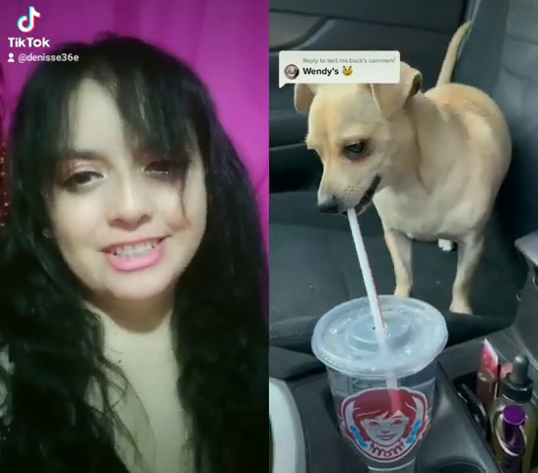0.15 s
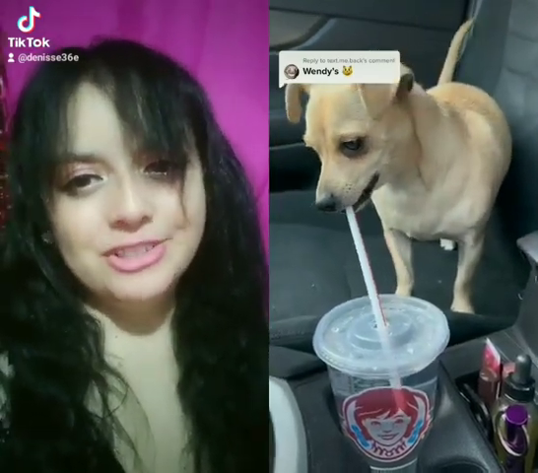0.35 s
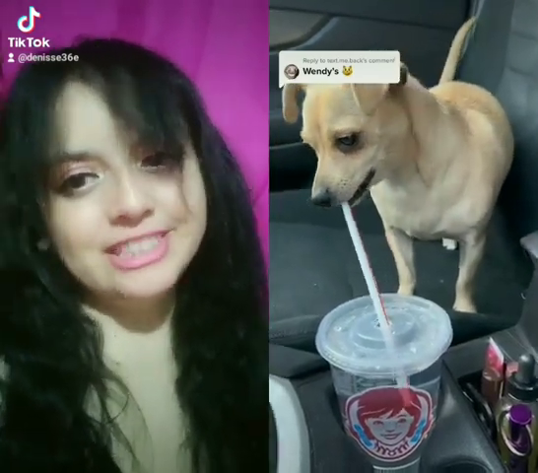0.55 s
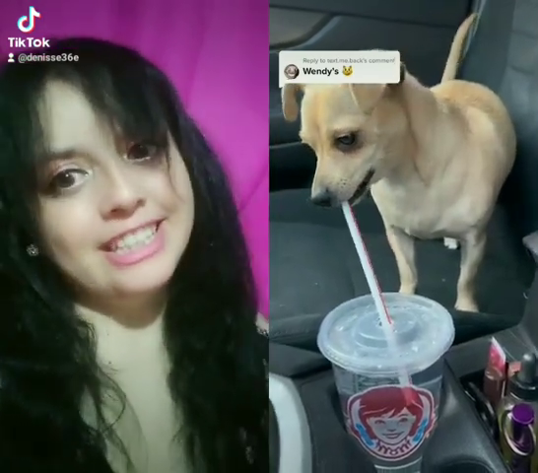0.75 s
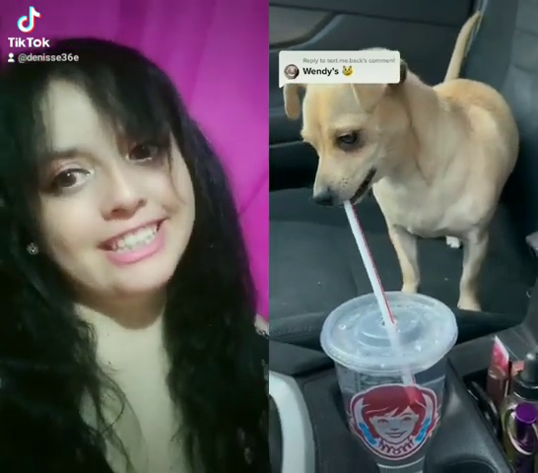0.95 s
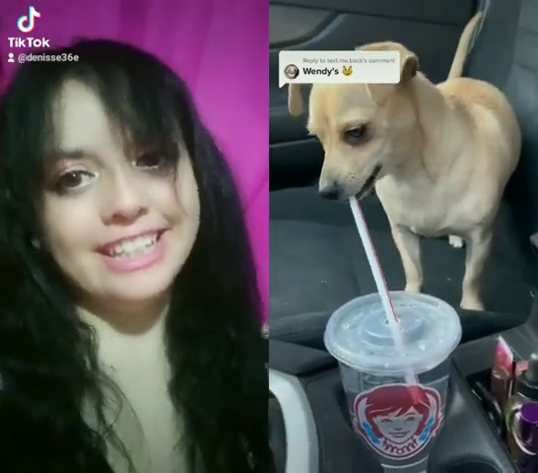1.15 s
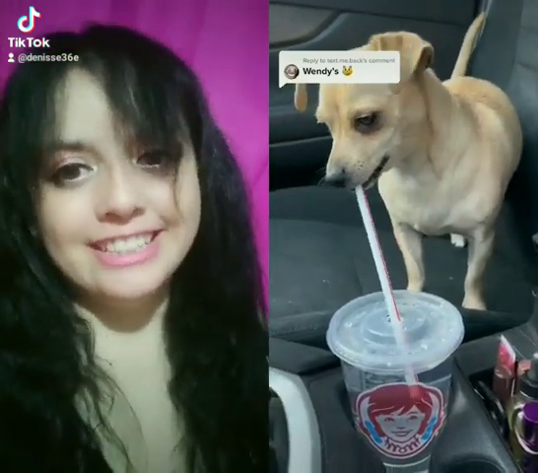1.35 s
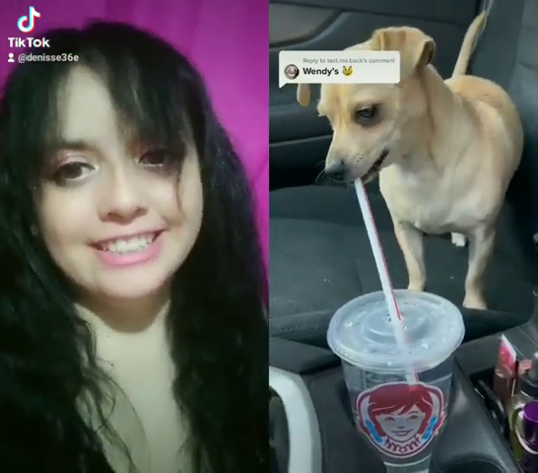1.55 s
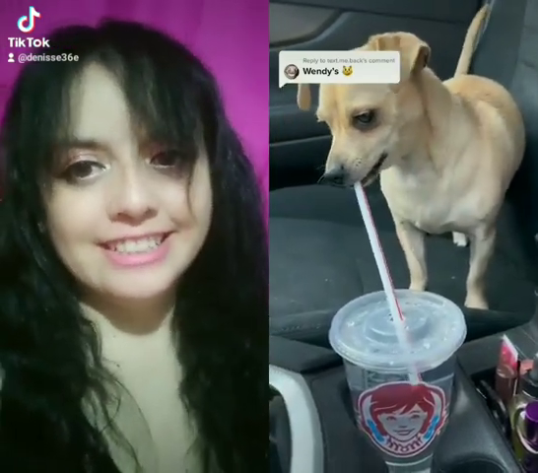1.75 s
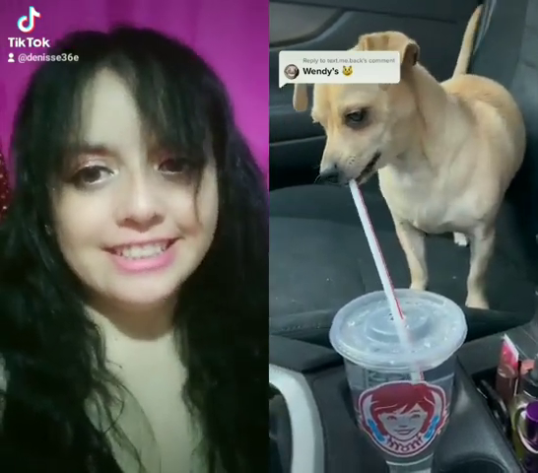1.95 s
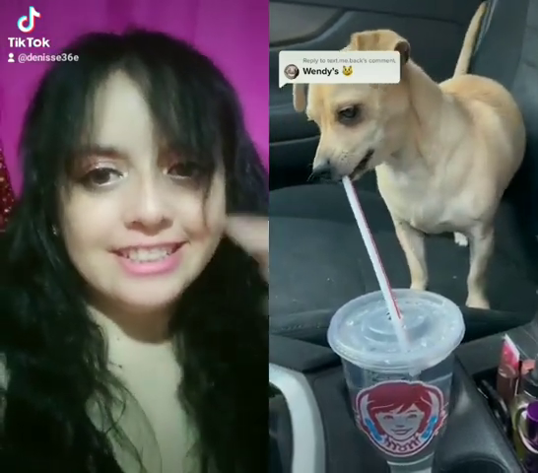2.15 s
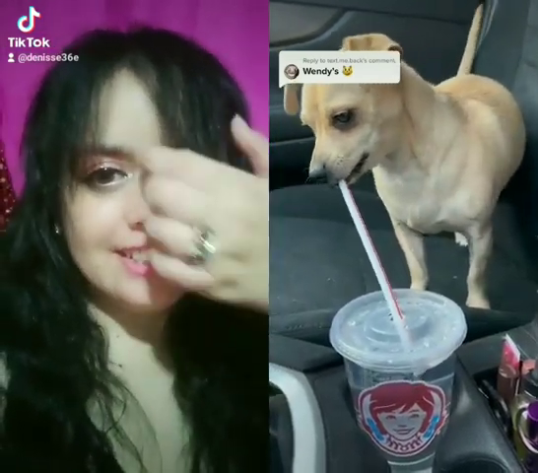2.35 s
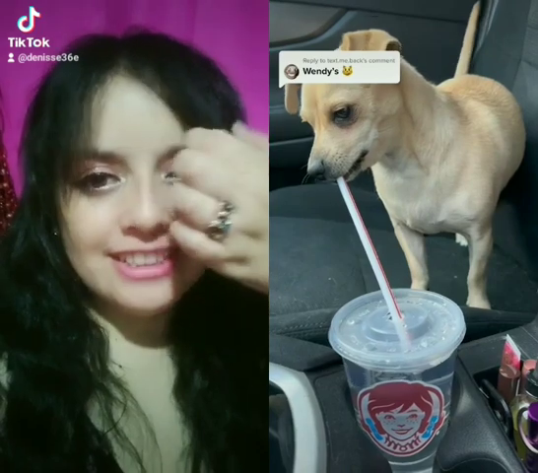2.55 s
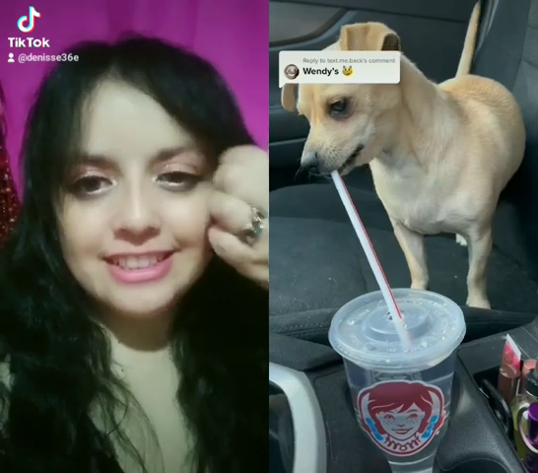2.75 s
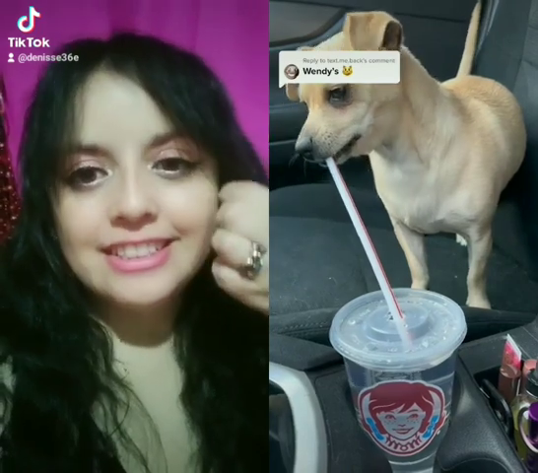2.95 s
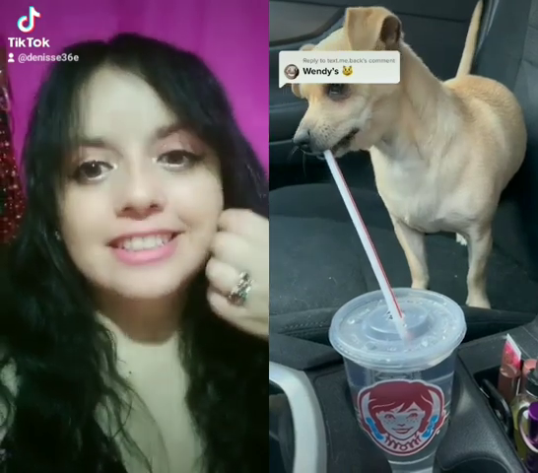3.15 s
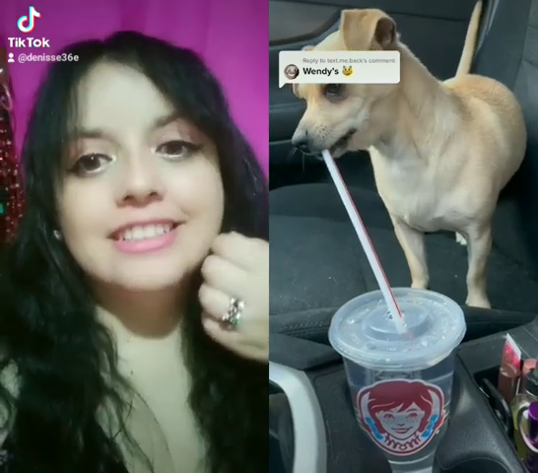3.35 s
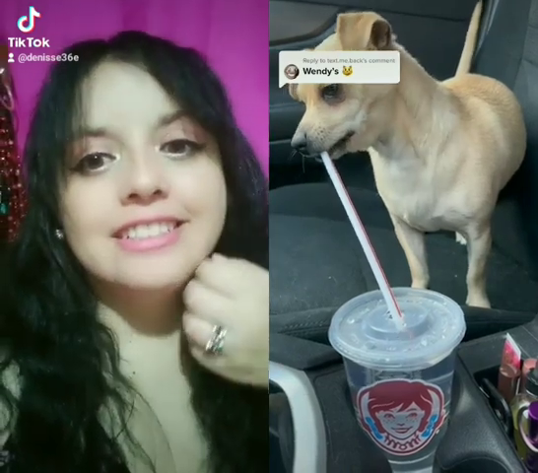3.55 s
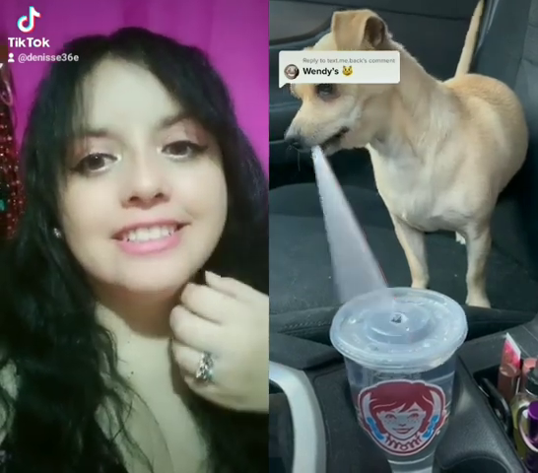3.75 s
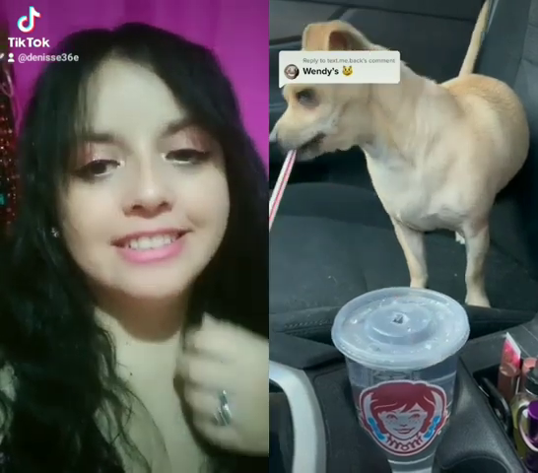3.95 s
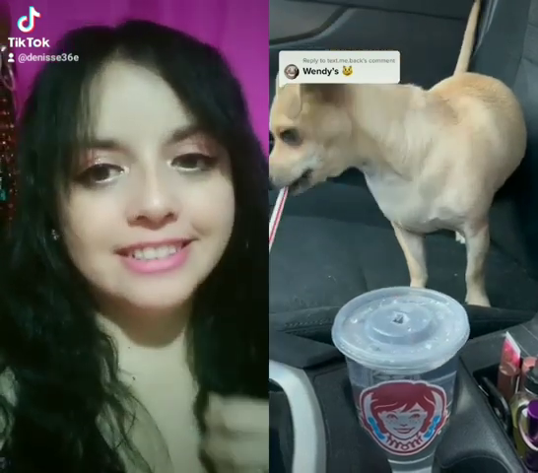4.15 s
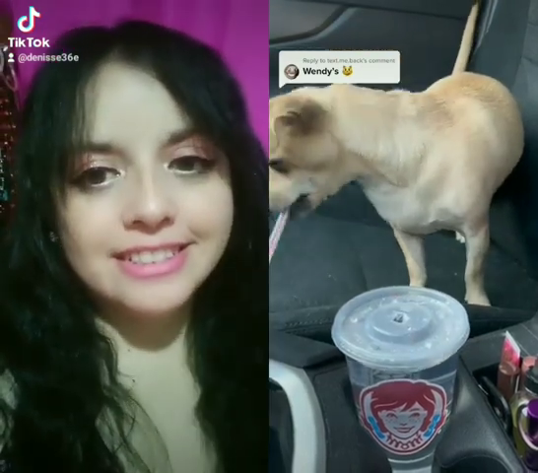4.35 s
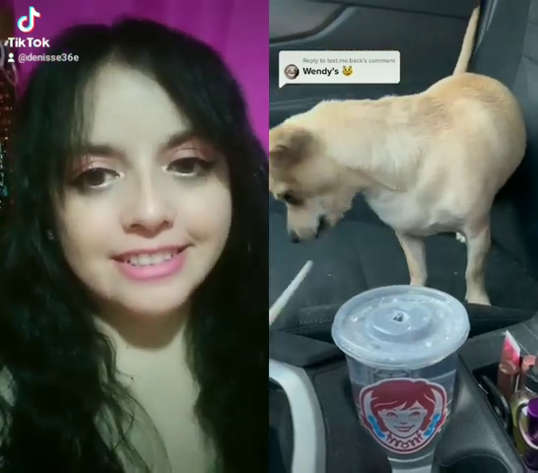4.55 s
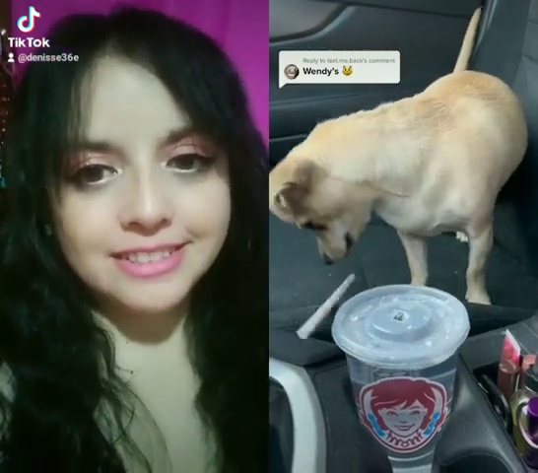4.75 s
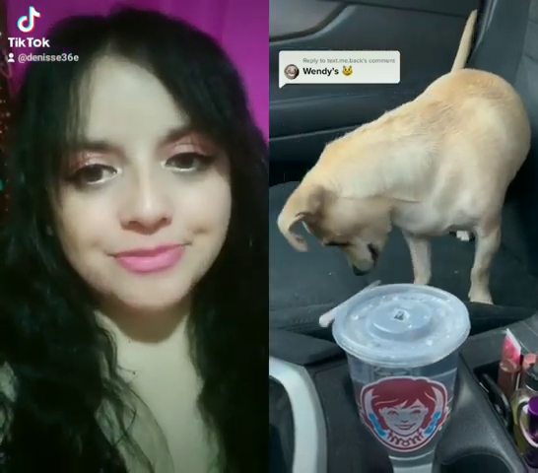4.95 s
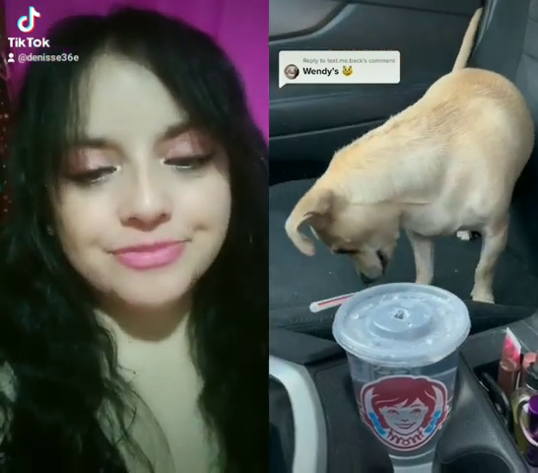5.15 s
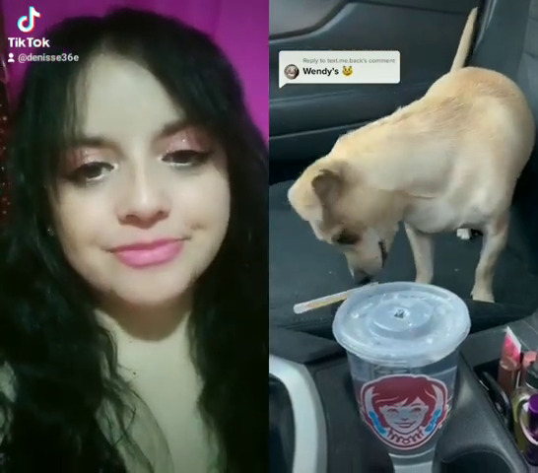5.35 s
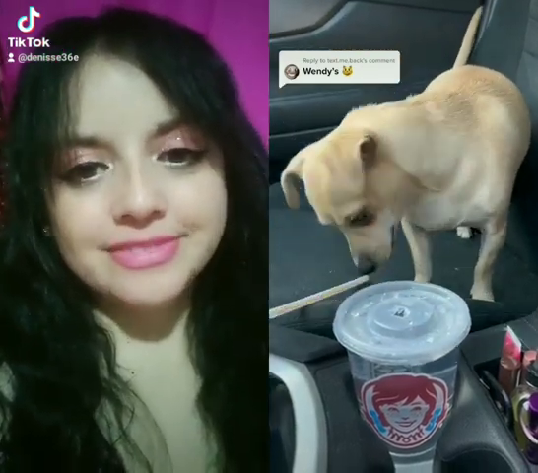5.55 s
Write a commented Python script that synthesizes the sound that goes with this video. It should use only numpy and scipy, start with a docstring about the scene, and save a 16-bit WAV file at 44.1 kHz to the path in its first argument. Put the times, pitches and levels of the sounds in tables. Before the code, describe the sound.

Close, sharp plastic clicks and short squeaky creaks build to a hollow rising pop, then faint ticks and a dull drop, inside an idling car.

```python
"""A plastic straw, close and central, is tugged by a small dog through the lid of an empty cup: it sticks
and slips in the slit as single clicks, then short creaks, until a rising pop as it comes free.
Teeth tick on the straw, which drops on to the seat; the cup's lid and the straw ring as filtered pushes.
Behind: an idling car's firing harmonics, rumble and ventilation noise, and two faint fan tones,
with short reflections from an upholstered cabin around the microphone."""
import sys
import numpy as np
from scipy import signal
from scipy.fft import rfft, irfft
from scipy.io import wavfile

SR = 44100
rng = np.random.default_rng(int(sys.argv[2]) if len(sys.argv) > 2 else 0)


def wav_out(sig):
    """Save sig, one row per channel (or a flat mono array), as 16-bit PCM at SR to the path in sys.argv[1]."""
    wavfile.write(sys.argv[1], SR, np.round(np.clip(np.atleast_2d(sig).T, -1, 1) * 32767).astype(np.int16))


N = 251370
T = np.arange(N) / SR
SIZE = 2 ** 14  # samples in one response
HZ = np.arange(SIZE // 2 + 1) * SR / SIZE

# Single slips of the straw in the slit, close by; the last one frees it:
# (t/s, level/dB, treble shelf/dB, ring of the slit's flap f/Hz, lift near that ring/dB)
SLIP_EVENTS = [(0.963, -65, -20, 1010, 19), (1.391, -56, 6, 1300, 7), (1.412, -53.5, 2, 1600, 13),
               (1.457, -57, -3, 1100, 6), (1.467, -53, -4, 1100, 7), (1.4981, -39.5, 5.5, 900, 9),
               (1.512, -33.5, 6.5, 900, 9.5), (1.5457, -30.5, 6, 2180, 2.5), (1.5626, -31, 6.5, 2200, 1.5),
               (1.8736, -46.5, 2, 4600, 12), (1.8867, -28.5, 3.5, 2660, 7),
               (1.9305, -28.5, -1.5, 2640, 7.5), (1.9361, -34, 7, 1400, 2), (1.9414, -31, 4, 1310, 14.5),
               (1.9485, -28.5, 6, 1750, 8), (2.1182, -29.5, 6.5, 4300, 3.5), (2.1662, -27.5, 7.5, 2720, -3),
               (2.731, -53, -6, 1250, 7.5), (2.794, -55.5, -3, 1500, 2), (2.838, -52, -5, 1300, 1),
               (2.901, -42, -9, 1800, 5.5), (3.186, -45.5, -11, 1090, -1), (3.199, -41, -8, 900, 6),
               (3.2068, -24, -5.5, 550, -0.5), (3.2625, -32, -13, 1300, 8), (3.3433, -29.5, -9, 1510, 3.5),
               (3.3495, -33, -8, 452, 0), (3.3602, -36.5, -1.5, 1290, 7), (3.5235, -28.5, -3, 447, 3),
               (3.541, -30.5, -7, 700, 2), (3.5558, -37.5, -9, 500, -2), (3.6176, -51, -13, 1290, 6),
               (3.7585, -39.5, -8, 890, 1.5), (3.8116, -23.5, -11, 1230, 6), (3.8209, -18, 0, 1270, 10.5),
               (3.8212, -17.5, -1, 560, 7)]


def slips():
    """The straw jumps in the slit and the lid snaps back."""
    out = np.zeros(N)
    for start, level_db, treble_db, flap_hz, flap_db in SLIP_EVENTS:
        click = irfft(lid_response(flap_hz, flap_db) * contact(treble_db))
        add(out, start, from_db(level_db) * click)
    return out


# Creaks and squeals at the lid, runs of quick slips:
# (start t/s, length t/s, first slip rate f/Hz, last slip rate f/Hz, level/dB, swell/dB, unevenness 0-1,
#  treble shelf/dB, first ring of the flap f/Hz, last ring f/Hz, lift near the ring/dB)
CREAK_RUNS = [(2.917, 0.022, 980, 850, -61.5, 3, 0.08, -17, 1000, 900, 13),
              (2.942, 0.039, 820, 810, -49, 5, 0.08, -21, 820, 840, 19),
              (2.946, 0.054, 258, 275, -43.5, 11, 0.2, -16, 396, 450, 15),
              (2.961, 0.032, 1010, 1030, -52, 2, 0.04, -19, 1020, 1080, 12),
              (2.972, 0.022, 200, 237, -48.5, 3, 0.18, -16, 1800, 2250, 9),
              (2.999, 0.021, 920, 967, -45.5, 3, 0.1, -13, 930, 990, 18),
              (3.002, 0.033, 310, 430, -40, 10, 0.05, -27, 330, 350, 14.5),
              (3.025, 0.0093, 354, 338, -28.5, 4.5, 0, -17, 596, 400, 9.5),
              (3.046, 0.026, 700, 560, -54.5, 1, .08, -15, 910, 900, 2),
              (3.148, 0.0072, 397, 355, -44, 1.5, 0, -14, 800, 1100, 12),
              (3.158, 0.017, 350, 366, -32, 0, 0.04, -8.5, 480, 1150, 9.5),
              (3.2125, 0.0091, 197, 211, -32.5, 2, 0.06, -3, 1270, 1390, 11.5),
              (3.3791, 0.0038, 227, 290, -35, 8.5, 0.05, -7, 1090, 1500, -1),
              (3.3874, 0.022, 231, 226, -26, 2.5, 0.12, -0.5, 1530, 263, 5),
              (3.6747, .011, 240, 190, -34, 11.5, 0.1, -12, 1010, 1010, -5),
              (3.687, 0.035, 206, 203, -24.5, -0.5, 0.01, -1, 915, 2460, 4.5),
              (3.8005, 0.011, 290, 310, -24.5, 2, .16, -4.5, 900, 1226, 6)]
CREAK_ATTACK, CREAK_RELEASE = 0.54, 0.32  # shares of a creak's length


def creaks(max_slips=50):
    """Under a steady pull the slips follow at a gliding rate; each run swells, holds and lets go."""
    out = np.zeros(N)
    for (start, length, first_rate, last_rate, level_db, swell_db, uneven,
         treble_db, first_hz, last_hz, flap_db) in CREAK_RUNS:
        timing, strength = rng.standard_normal((2, max_slips))
        expected_slips = length * (first_rate + last_rate) / 2
        rate = np.interp(np.arange(max_slips), [0, expected_slips], [first_rate, last_rate])
        # early and late slips add up, so the pitch wanders
        gaps = np.abs(1 + uneven * timing) / rate
        at = np.cumsum(gaps) - gaps[0]
        at = at[at <= length]
        slack = np.interp(at / length, [0, CREAK_ATTACK, 1 - CREAK_RELEASE, 1], [1, 0, 0, 1])
        force = from_db(level_db - swell_db * slack + 10 * uneven * strength[:len(at)])
        # the flap bends as the straw moves, so its ring shifts through the run
        bend = (np.arange(len(at)) + 0.5) / len(at)
        creak = 0
        for flap_hz, share in ((first_hz, 1 - bend), (last_hz, bend)):
            lid = lid_response(flap_hz, flap_db)
            push = contact(treble_db, tear_s=0.0055, tear_hz=2920, at=at, force=force * share)
            creak = creak + lid * push
        # the pull fixes the energy released, however the rings of the slips overlap
        energy_gain = np.linalg.norm(force) * np.linalg.norm(lid) / np.linalg.norm(creak)
        add(out, start, irfft(creak * energy_gain))
    return out


# Modes of the lid and cup, close by: (f/Hz, width f/Hz, level/dB)
LID_MODES = [(215, 72, 5), (327.5, 151, 9.5), (520, 310, 7.5), (628, 136, 12), (828, 58, 6),
             (1008, 133, 3.5), (1291, 263, 1.5), (1802, 190, -4), (2223, 306, -5.5), (2603, 370, -12),
             (3440, 570, -22.5), (4350, 1200, -20.5), (5320, 510, -25), (6910, 2400, -21.5),
             (14950, 2000, -38.5)]


def lid_response(flap_hz, flap_db, flap_octaves=0.48, detune=0.011):
    """Each slip shares its force differently among the modes and favours those near the flap's ring."""
    hz, width, level_db = np.transpose(LID_MODES)
    pitch_chance, level_chance = np.clip(rng.standard_normal((2, len(LID_MODES))), -2, 2)
    favour_db = flap_db * np.exp(-(np.log2(hz / flap_hz) / flap_octaves) ** 2)
    modes = zip(hz * (1 + detune * pitch_chance), width, level_db + favour_db + level_chance)
    return body(modes, travel_s=0.0016)


def contact(treble_db, corner_hz=2400, tear_s=0.0041, tear_hz=2200, at=(0,), force=(1,)):
    """Each contact is one push in the bass and a brief burst of tiny tears in the treble; soft ones are dull."""
    pushes = np.array(force) @ np.exp(-2j * np.pi * np.outer(at, HZ))
    age = T[:SIZE] - np.array(at)[:, None]
    tear_power = np.square(force) @ (np.exp(-2 * np.abs(age) / tear_s) * (age >= 0))
    tears = rng.standard_normal(SIZE) * np.sqrt(tear_power)
    tears = rfft(tears * np.linalg.norm(force) / np.linalg.norm(tears))
    # crossover: pushes below tear_hz, tears above
    s = 1j * HZ / tear_hz
    drive = (pushes + s ** 3 * tears) / ((1 + s) * (1 + s + s * s))
    # treble shelf around corner_hz
    s = 1j * HZ / corner_hz
    gain = from_db(treble_db)
    return drive * (1 + np.sqrt(gain) * s + gain * s * s) / (1 + s + s * s)


def body(modes, travel_s):
    """Causal response of thin plastic; bending waves carry treble ahead of bass. Unit rms over 5 ms."""
    power = sum((from_db(db) * resonance(HZ, hz, width)) ** 2 for hz, width, db in modes)
    # the causal half of the cepstrum gives minimum phase
    cepstrum = irfft(np.log(power + 1e-7))[:SIZE // 2]
    dispersion = 4j * np.pi * travel_s * np.sqrt(1000 * HZ)
    response = np.exp(rfft(cepstrum, SIZE) - dispersion)
    return response / np.sqrt(np.sum(irfft(response) ** 2) / (0.005 * SR))


def resonance(hz, centre, width):
    """Gain of a resonance with steep skirts, 1 on top."""
    return (hz * width) ** 2 / ((centre ** 2 - hz ** 2) ** 2 + (hz * width) ** 2)


# The straw gliding without sticking, in the slit and at last between the teeth:
# (start t/s, length t/s, hiss level/dB, crackle level/dB, rise/dB per s, fall/dB per s)
GLIDE_EVENTS = [(0.507, 0.017, -60.5, -72.5, 174, 140), (1.387, 0.026, -54, -68.5, 233, 110),
                (1.463, 0.055, -54, -74, 200, 197), (2.954, 0.053, -47.5, -74, 257, 173),
                (3.164, 0.014, -52, -64, 299, 303), (3.809, 0.014, -58, -51.5, 595.5, 594),
                (3.987, 0.011, -68, -71.5, 304, 397), (4.12, .09, -73, -80, 200, 300)]
# Relative colour of the friction hiss: (f/Hz, level/dB per Hz)
FRICTION_COLOUR = [(150, -2.5), (400, 14.5), (900, 9), (1300, 5), (1600, -6.5), (2300, -14), (3000, -11.5),
                   (3900, -16), (4500, -13), (5500, -23.5), (7200, -17.5), (10500, -44), (15000, -37.5)]
# Relative colour of the crackle as the slit's edges catch on the straw: (f/Hz, level/dB per Hz)
CRACKLE_COLOUR = [(500, -19.5), (1300, 4.5), (2200, 5.5), (3300, -8.5), (4500, 1.5), (5500, -5.5),
                  (6800, -1), (9000, -20.5), (15000, -29)]
CRACKLES_PER_S = 740
# rub during each creak: level from the creak's own, rise, fall
CREAK_RUB_DB, CREAK_RUB_RISE_DB_PER_S, CREAK_RUB_FADE_DB_PER_S = -11.5, 1397, 562


def slide(grain_db=2.5, patchy_db=2.0):
    """Grainy friction hiss whenever the straw glides or creaks; a glide also crackles."""
    gliding, catching, creaking = [], [], []
    for start, length, hiss_db, crackle_db, rise, fall in GLIDE_EVENTS:
        gliding.append(swell(start, length, hiss_db, rise, fall))
        catching.append(swell(start, length, crackle_db, 2 * rise, fall))  # crackle rises twice as fast
    for start, length, _, _, level_db, *_ in CREAK_RUNS:
        hold_start = start + CREAK_ATTACK * length
        hold_length = (1 - CREAK_ATTACK - CREAK_RELEASE) * length
        creaking.append(swell(hold_start, hold_length, level_db + CREAK_RUB_DB,
                              CREAK_RUB_RISE_DB_PER_S, CREAK_RUB_FADE_DB_PER_S))
    flutter_db = grain_db * drift(300) + patchy_db * drift(35)
    hiss = rms_one(noise(FRICTION_COLOUR) * from_db(flutter_db))
    crackle = noise(CRACKLE_COLOUR, CRACKLES_PER_S)
    return np.max(gliding + creaking, axis=0) * hiss + np.max(catching, axis=0) * crackle


POP_S, POP_DB, POP_T60_S, POP_ATTACK_S = 3.828, -19.5, 0.1, 0.0048  # level before attack and decay
POP_FROM_HZ, POP_TO_HZ, POP_CLEARS_S = 67, 226.3, 0.0095


def pop():
    """The cup's air rings as the straw leaves; its note rises while the hole clears."""
    out, t = np.zeros(N), T[:SIZE]
    hz = POP_TO_HZ + (POP_FROM_HZ - POP_TO_HZ) * np.exp(-t / POP_CLEARS_S)
    level = from_db(POP_DB - 60 * t / POP_T60_S) * (1 - np.exp(-t / POP_ATTACK_S))
    add(out, POP_S, level * np.sin(2 * np.pi * np.cumsum(hz) / SR))
    return out


# Knocks on the straw as it flicks past the lid, shifts between the teeth and bounces on the seat:
# (t/s, level/dB, treble shelf/dB, width added by the grip f/Hz)
STRAW_KNOCKS = [(0.5743, -68.5, -8, 1100), (0.88, -73, -3, 900), (1.21, -74, -6, 990),
                (2.335, -70.5, -3, 900), (3.8194, -42, 8.5, 4500), (3.832, -49, 14.5, 700),
                (3.8376, -58.5, 16, 640), (3.844, -61, 3, 900), (3.852, -51.5, 8, 1000),
                (3.985, -68, 6, 420), (3.993, -65.5, 3.5, 840), (4.0432, -56.5, 1.5, 310),
                (4.047, -57, 0, 1400), (4.089, -69, -4, 1500), (4.126, -63, -4, 1400),
                (4.133, -66, -7, 1400), (4.152, -58, -3, 1700), (4.158, -63, -3, 1500),
                (4.2004, -61.5, -10, 740), (4.233, -61, 5.5, 950), (4.237, -62.5, 2, 1100),
                (4.6096, -49.5, 4, 360), (4.6105, -47.5, -15, 20), (4.635, -57.5, 3, 240),
                (4.652, -62.5, 4, 540), (4.664, -68, -10, 530), (4.672, -68, -10, 500),
                (4.682, -74, -14, 400), (4.711, -72, -10, 350), (4.7738, -68.5, -9, 110)]
# Modes of the straw, an open tube: (f/Hz, width f/Hz, level/dB)
STRAW_MODES = [(800, 390, 3.5), (1626, 88, 3), (2446, 70, 13.5), (3200, 520, -9.5), (4185, 140, 0),
               (5040, 230, -8.5), (5920, 260, -5.5), (7400, 1400, -21), (15100, 3400, -28)]


def straw():
    """A free straw rings like a tube; a grip widens and flattens its modes, leaving a dry tick."""
    out = np.zeros(N)
    for start, level_db, treble_db, grip_hz in STRAW_KNOCKS:
        modes = []
        for hz, width, mode_db in STRAW_MODES:
            damping_db = 20 * np.log10(1 + grip_hz / width)
            chance_db = 0.5 * rng.standard_normal()
            modes.append((hz, width + grip_hz, mode_db - damping_db + chance_db))
        tick = contact(treble_db, corner_hz=3620, tear_s=0.0023, tear_hz=3300)
        add(out, start, from_db(level_db) * irfft(body(modes, travel_s=0.00012) * tick))
    return out


# Soft thumps on the seat: (t/s, f/Hz, starting level/dB, t60/s)
SEAT_THUMPS = [(0.714, 371, -47, 0.17), (4.6114, 294, -39, 0.062), (4.612, 495, -30.5, 0.015),
               (4.7750, 525, -40, 0.026)]


def thumps():
    """The padded seat answers with short dull notes."""
    out, t = np.zeros(N), T[:SIZE]
    for start, hz, level_db, t60 in SEAT_THUMPS:
        add(out, start, from_db(level_db - 60 * t / t60) * np.sin(2 * np.pi * hz * t))
    return out


# Relative colour of the rasp on the seat: (f/Hz, level/dB per Hz)
RASP_COLOUR = [(600, -18), (1400, 3), (2000, -7.5), (2450, -3), (3000, -17), (4200, -1), (4520, -5),
               (5000, -16), (6200, -17), (9000, -29), (15000, -36)]
SKID_START_S, SKID_LENGTH_S, SKID_DB = 4.64, 0.08, -73


def skid(grains_per_s=2000, rise_db_per_s=900, fall_db_per_s=400):
    """The dropped straw rasps thinly over the weave of the seat."""
    gain = swell(SKID_START_S, SKID_LENGTH_S, SKID_DB, rise_db_per_s, fall_db_per_s)
    return gain * noise(RASP_COLOUR, grains_per_s)


# Early decay in the upholstered cabin: (f/Hz, t60/s)
CABIN_DECAY = [(200, 0.11), (1000, 0.074), (4000, 0.06), (8000, 0.083), (16000, 0.07)]


def cabin(x, late_db=-25, late_t60=0.34, first_s=0.0018):
    """Dense early reflections that the seats soak up quickly, and a faint tail between the windows."""
    t, edges = T[:SIZE], [100, 400, 1500, 4000, 9000, SR / 2]
    white = rfft(rng.standard_normal(SIZE))
    echo = 0
    for low, high in zip(edges, edges[1:]):
        t60 = at_hz(CABIN_DECAY, np.sqrt(low * high))
        decay = from_db(-60 * t / t60) + from_db(late_db - 60 * t / late_t60)
        echo = echo + irfft(white * (HZ >= low) * (HZ < high)) * decay
    # silent until first_s, full at twice that
    echo = echo * np.clip(t / first_s - 1, 0, 1)
    return signal.fftconvolve(x, echo / np.sqrt(np.sum(echo ** 2)))[:N]


# Engine hum in the cabin: (multiple of the firing rate, mean level/dB rms)
FIRING_ORDERS = [(1, -52.5), (2, -47), (3, -48), (4, -64.5), (5, -64), (6, -72), (7, -63), (8, -59),
                 (10, -67), (11, -72.5), (13, -67.5)]
# Relative colour of engine rumble and ventilation: (f/Hz, level/dB per Hz)
AIR_COLOUR = [(20, -19), (36, 0), (75, 0), (115, -4), (160, -11.5), (350, -18.5), (520, -20.5), (780, -27),
              (1050, -40), (1280, -44.5), (1700, -47.5), (2350, -43.5), (2900, -47), (3800, -51.5),
              (6500, -56.5), (10000, -68), (16000, -68.5)]
# Stereo width of rumble and ventilation: (f/Hz, side minus mid level/dB)
AIR_SIDE = [(60, -76), (110, -73.5), (200, -32.5), (380, -10.5), (700, -5.5), (1290, -1), (2380, -16),
            (4400, -9.5), (8120, -12.5), (15000, -4)]
# the idle slowly settles and hunts a little: start rate, fall, spread
IDLE_HZ, IDLE_SAG_HZ_PER_S, IDLE_HUNT_HZ = 27.5, 0.1, 0.15


def engine(waver_db=0.7):
    """Firing orders boom in the cabin over a rumble that throbs with the engine; gives mid and side."""
    firings = IDLE_HZ - IDLE_SAG_HZ_PER_S * T + IDLE_HUNT_HZ * drift(0.98)
    turn = 2 * np.pi * np.cumsum(firings) / SR  # one turn per firing
    hum = np.zeros(N)
    for order, level_db in FIRING_ORDERS:
        level = np.sqrt(2) * from_db(level_db + waver_db * drift(8.0))
        phase = 2 * np.pi * rng.random() + 0.032 * order * drift(1.5)
        hum += level * np.sin(order * turn + phase)
    air, across = from_db(-48.0) * np.array([noise(AIR_COLOUR), noise(AIR_COLOUR)])
    throb = from_db(0.6 * np.sin(turn))
    width = from_db(at_hz(AIR_SIDE, np.arange(N // 2 + 1) * SR / N))
    return hum + air * throb, irfft(rfft(across) * width, N)


# Faint fan tones: (f/Hz, wander f/Hz, mean level/dB rms)
FAN_TONES = [(517, 5.06, -69.5), (741, 5, -70.5)]


def fan(waver_db=2.0):
    """The blower sings faintly on two nearly steady tones."""
    out = np.zeros(N)
    for hz, wander, level_db in FAN_TONES:
        level = np.sqrt(2) * from_db(level_db + waver_db * drift(5.2))
        out += level * np.sin(2 * np.pi * np.cumsum(hz + wander * drift(12)) / SR)
    return out


def from_db(db):
    """Decibels to gain."""
    return 10 ** (np.asarray(db) / 20)


def rms_one(x):
    """Scale to rms 1."""
    return x / np.sqrt(np.mean(x ** 2) + 1e-20)


def at_hz(points, hz):
    """A spectrum joined by straight lines on a log-frequency axis."""
    knots, values = np.transpose(points)
    return np.interp(np.log(np.maximum(hz, 1)), np.log(knots), values)


def noise(spectrum, grains_per_s=SR):
    """Noise of a given colour above 18 Hz, smooth or made of separate grains; rms 1."""
    hz = np.arange(N // 2 + 1) * SR / N
    grains = rng.standard_normal(N) * (rng.random(N) < grains_per_s / SR)
    return rms_one(irfft(rfft(grains) * from_db(at_hz(spectrum, hz)) * (hz > 18), N))


def drift(rate_hz):
    """Slow chance, mostly below rate_hz, with rms 1."""
    hz = np.arange(N // 2 + 1) * SR / N
    return rms_one(irfft(rfft(rng.standard_normal(N)) / (1 + (hz / rate_hz) ** 4), N))


def swell(start, length, db, rise_db_per_s, fall_db_per_s):
    """Gain that rises, holds from start for length, and falls."""
    before = np.maximum(start - T, 0)
    after = np.maximum(T - start - length, 0)
    return from_db(db - rise_db_per_s * before - fall_db_per_s * after)


def high_pass(x, hz):
    """Second-order high-pass."""
    return signal.sosfilt(signal.butter(2, hz, "high", fs=SR, output="sos"), x)


def add(out, start, sound):
    """Mix a sound in from start, in seconds."""
    i = max(round(start * SR), 0)
    out[i:i + len(sound)] += sound[:N - i]


def scene():
    """Straw, cup and seat are close and central; reflections and cabin air differ between the sides."""
    plastic = slips() + creaks() + slide() + pop() + straw() + thumps() + skid()
    treble = high_pass(plastic, hz=3550)
    car_mid, car_side = engine()
    mid = plastic + from_db(-13.5) * cabin(plastic) + from_db(-13.0) * cabin(treble)
    mid = mid + car_mid + fan()
    side = from_db(-25.0) * cabin(high_pass(plastic, hz=611)) + from_db(-15.0) * cabin(treble)
    side = side + car_side
    return np.array([mid + side, mid - side])


CUTOFF_HZ = 15900


def record(dry):
    """At the microphone the top is cut steeply."""
    return signal.sosfilt(signal.ellip(10, 0.1, 80, CUTOFF_HZ, fs=SR, output="sos"), dry)


dry = scene()
out = record(dry)
wav_out(out)
```